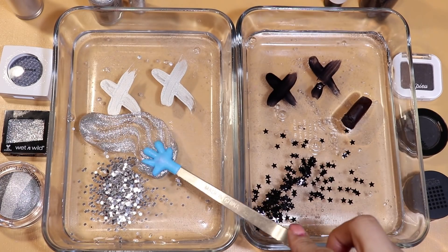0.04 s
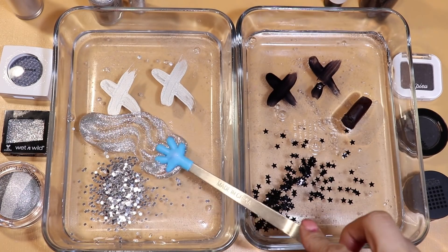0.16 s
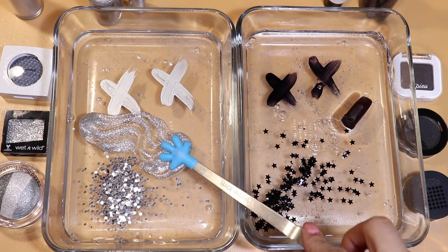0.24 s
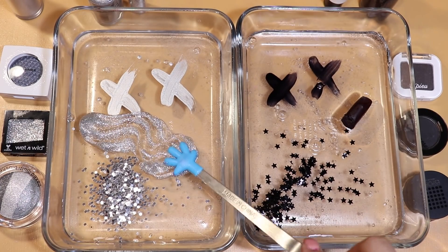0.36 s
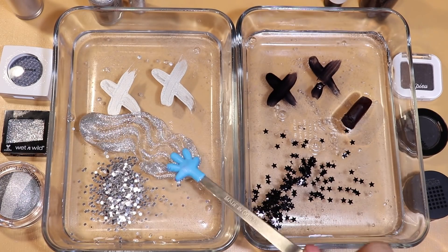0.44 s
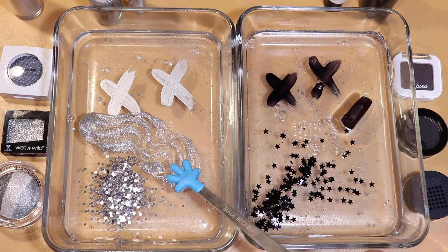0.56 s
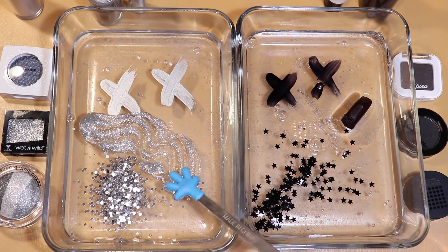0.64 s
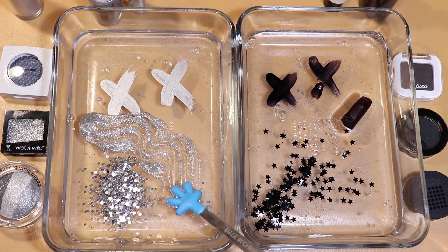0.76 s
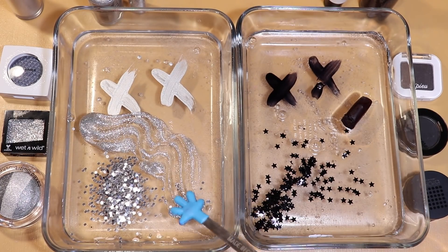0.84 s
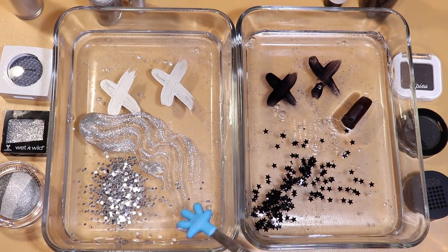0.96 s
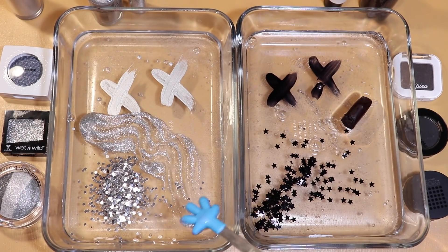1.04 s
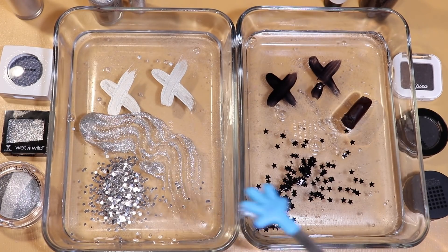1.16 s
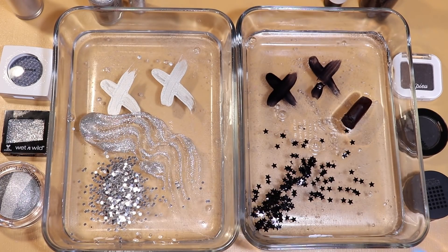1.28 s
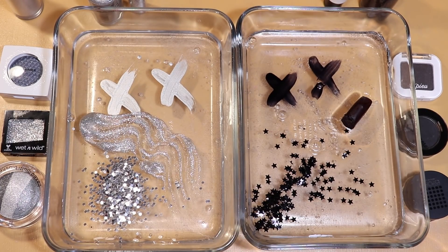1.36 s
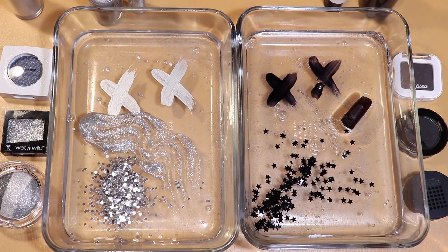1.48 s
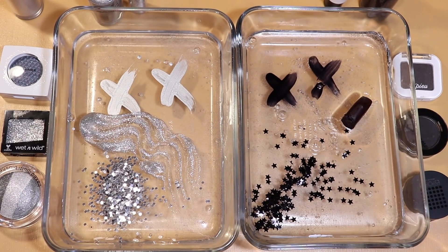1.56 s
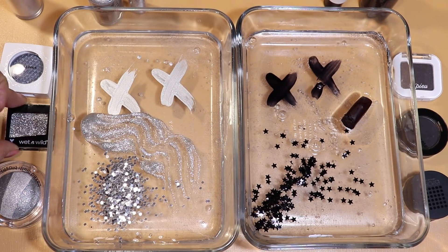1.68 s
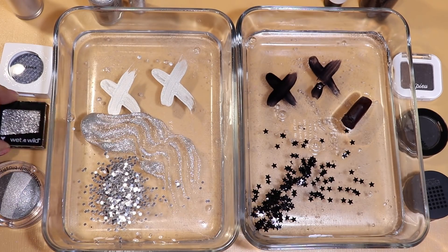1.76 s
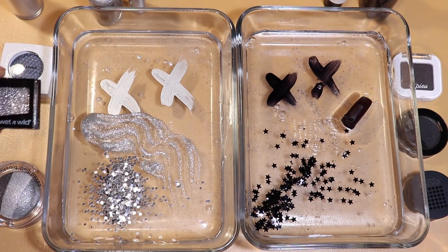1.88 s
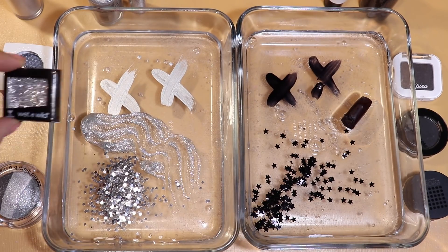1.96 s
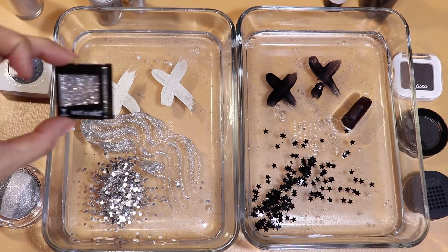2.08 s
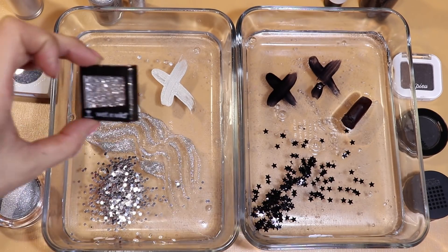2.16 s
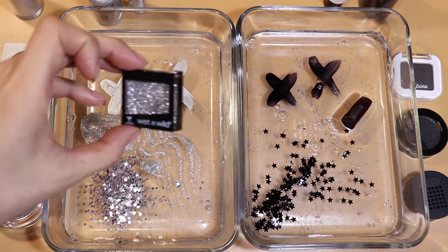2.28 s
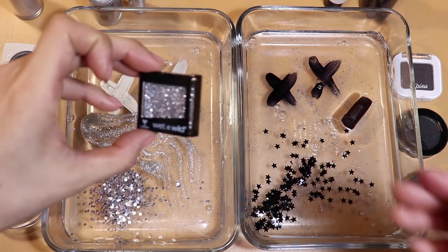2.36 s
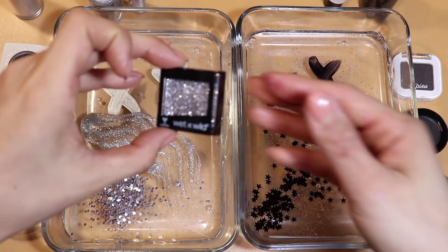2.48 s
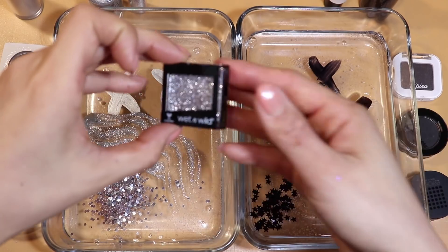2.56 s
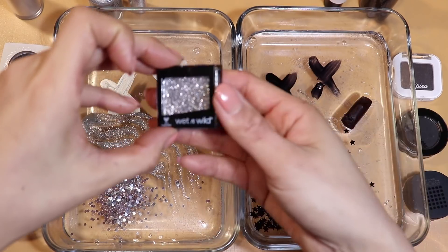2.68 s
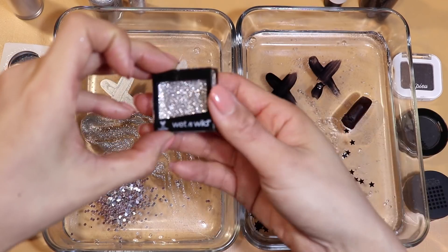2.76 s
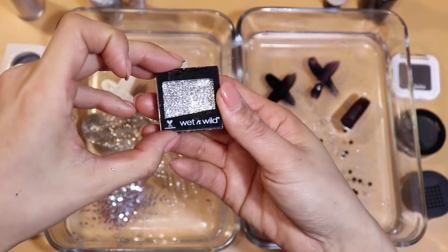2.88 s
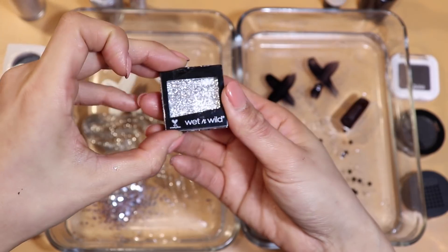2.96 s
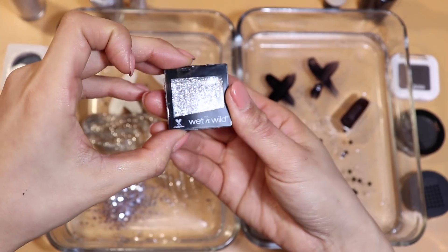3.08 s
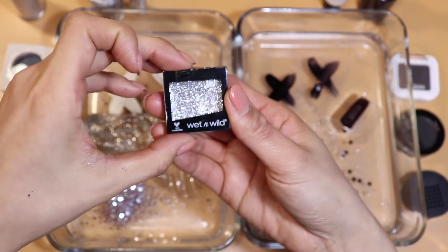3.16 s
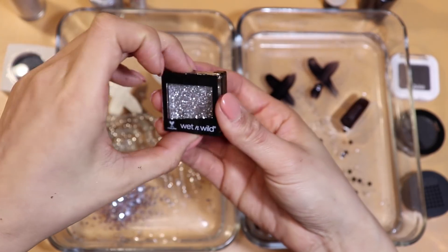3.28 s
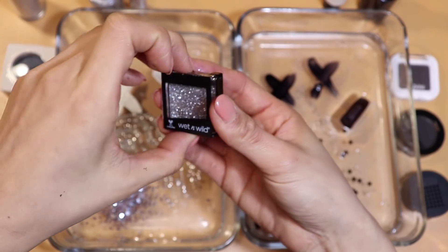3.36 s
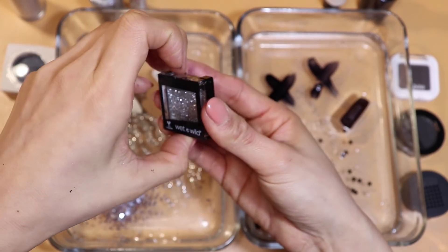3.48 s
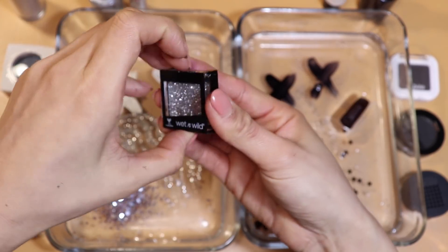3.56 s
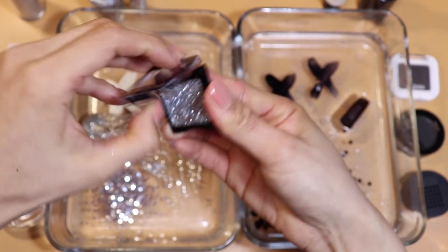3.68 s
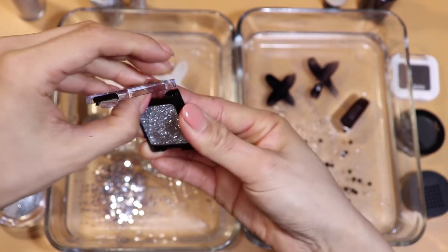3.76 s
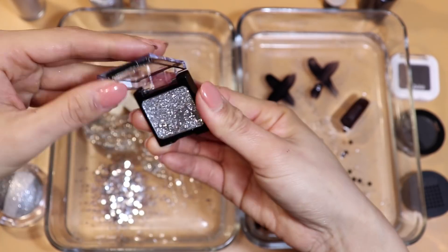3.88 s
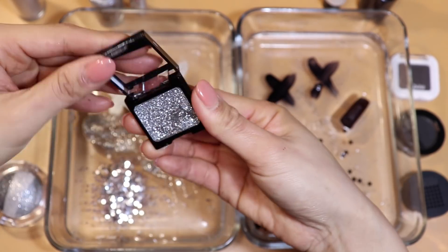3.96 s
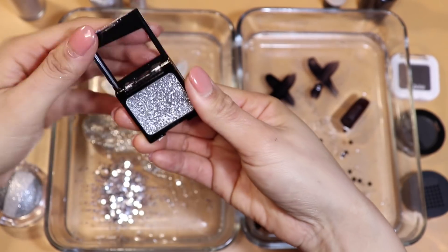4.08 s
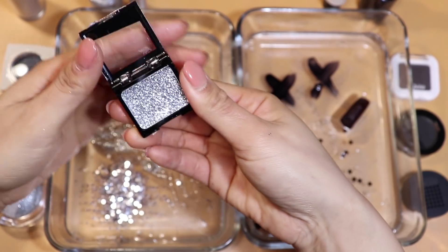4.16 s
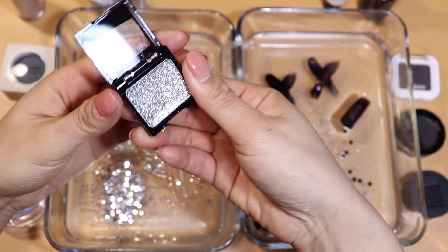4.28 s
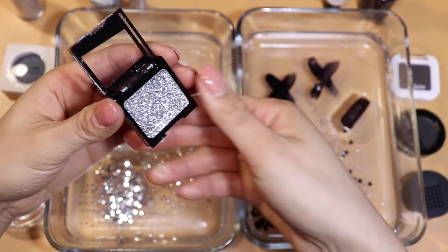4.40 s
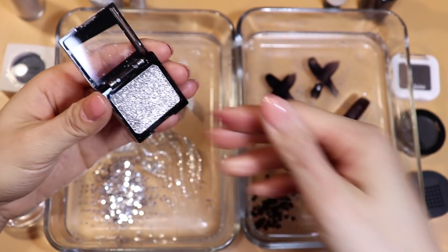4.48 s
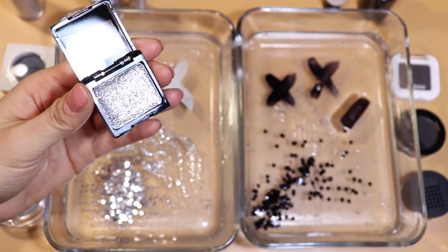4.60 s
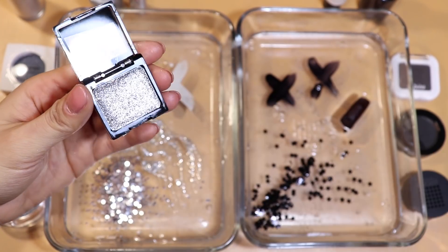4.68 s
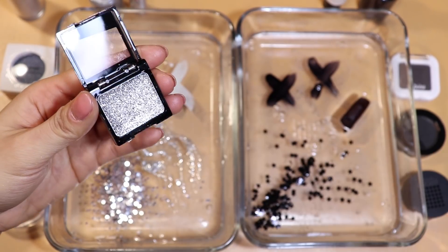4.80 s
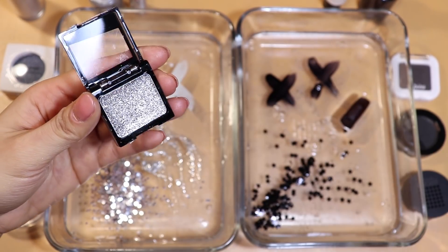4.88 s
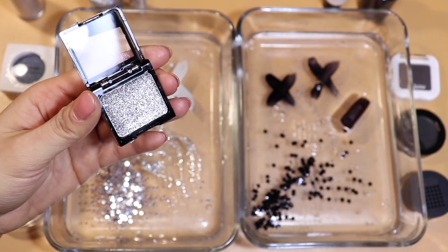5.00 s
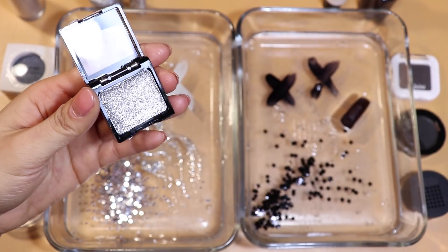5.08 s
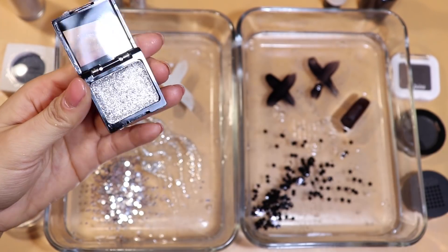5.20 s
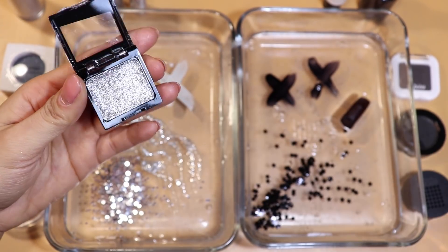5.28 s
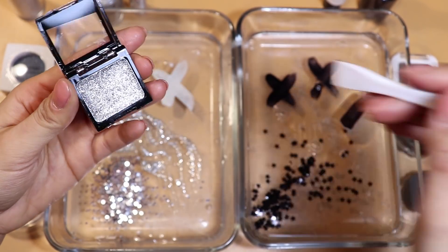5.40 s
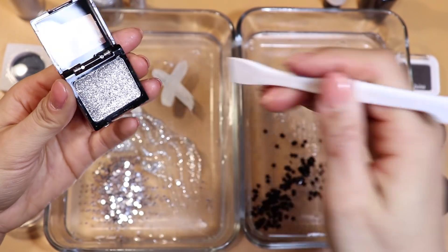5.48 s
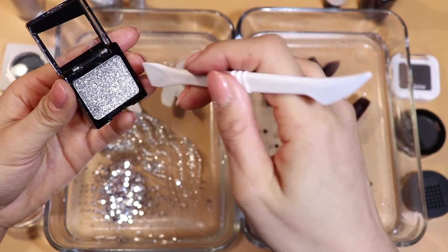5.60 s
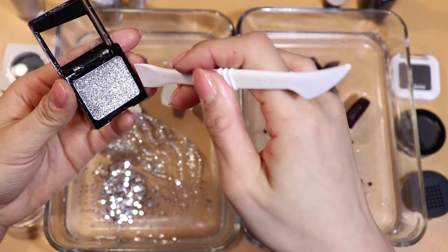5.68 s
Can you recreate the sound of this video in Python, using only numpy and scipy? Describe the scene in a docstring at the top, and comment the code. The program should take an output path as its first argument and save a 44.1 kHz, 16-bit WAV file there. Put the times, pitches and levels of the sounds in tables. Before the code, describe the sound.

In a small quiet room with faint ventilation hum and hiss, tongs give a light tick on a glass dish, then land on a table with a low, soft thud and a metal click. Fingers pat and slide on a plastic case, its catch clicks, and the lid snaps free very sharply. The hinge rubs faintly, then a plastic spatula clatters briefly. Close stereo microphones, short room echo.

```python
"""Small metal-handled tongs tick on a glass dish and are laid on a craft table, soft end first, with a thud;
fingers handle a plastic compact, its catch gives, the lid snaps free, the hinge rubs, and a plastic spatula
clatters softly as it is picked up. Two microphones stand close above the table in a small quiet room;
ventilation hums and the microphones hiss. Each touch is a click or a swell of tiny slips that rings resonances,
with a level and time offset between microphones, nearby reflections and echo. Hum and hiss are shaped noise."""
import sys
import numpy as np
from scipy import signal
from scipy.fft import rfft, irfft, next_fast_len
from scipy.io import wavfile

SR = 44100
rng = np.random.default_rng(int(sys.argv[2]) if len(sys.argv) > 2 else 0)


def to_wav(sig):
    """Store sig (one row per channel, or 1-D mono) as 16-bit WAV at the path in sys.argv[1].

    Samples outside -1..1 are clipped; the rate is SR.
    """
    pcm = np.clip(np.atleast_2d(sig), -1, 1) * 32767
    pcm = np.round(pcm).astype(np.int16)
    wavfile.write(sys.argv[1], SR, pcm.T)  # frames by channels


N = 252951  # length [samples]

# Air rumble and hiss, spectrum before overall scaling: (frequency [Hz], relative density [dB])
AIR_SPECTRUM = [(15, -59), (25, -8), (37, -28), (59, -4), (96, -5), (141, -5.5), (248, -4), (276, -9),
                (316, -7), (486, -8), (527, -10.5), (620, -10.5), (791, -12), (8730, -22.5), (15800, -33)]
# Stereo width of the air: (frequency [Hz], side minus mid [dB])
AIR_WIDTH = [(60, -6.5), (110, -1), (200, -1), (380, -1), (700, -0.5), (1290, 0), (2380, 0.5), (4400, 0.5),
             (8120, -0.5), (15000, 0.5)]
AIR_MID_RMS_DB = -58
# Ventilation hum: (frequency [Hz], width of each filter pass [Hz], rms before the slight left tilt [dB])
VENTILATION_HUM = [(72, 15, -76), (141.8, 2.65, -69.5), (281.3, 35, -69)]
# Room echo: (frequency [Hz], time to fall by 60 dB [s])
ROOM_T60 = [(150, 0.27), (1000, 0.32), (4000, 0.27), (8000, 0.29), (15000, 0.17)]

# Tongs tick on the dish: (time [s], level [dB], sliding time [s], hardness [Hz])
TONGS_TICKS = [(.3453, -9, 0.00069, 14000), (.3495, -10.5, 0.0018, 9000), (.377, -24, 0.0026, 4000)]
# Resonances of tongs and dish: (frequency [Hz], width of each filter pass [Hz], level [dB])
TONGS_MODES = [(1760, 170, -0.5), (2860, 400, -5), (3750, 290, -2), (4520, 640, -5), (5800, 1100, -10),
               (6940, 1150, -6), (11200, 7900, -14)]

# The tongs' soft end lands with a thud and rocks to rest, each bump weaker than the last
THUD_S, THUD_DB, THUD_SLIDING_S, THUD_HARDNESS_HZ = 1.0135, 2, 0.0016, 350
ROCK_GAP_S, ROCK_LOSS_DB = .019, 1.5
# Their metal handle clicks on the table: (time [s], level [dB], hardness [Hz]); then it drags a little
HANDLE_CLICKS = [(1.0205, -4, 3000), (1.0283, -3, 11000), (1.0308, -1, 3800)]
HANDLE_SLIDING_S = 0.002
DRAG_AFTER_S, DRAG_DB, DRAG_SLIDING_S, DRAG_HARDNESS_HZ = .022, -2.5, .02, 3200
# Resonances of the table under the tongs: (frequency [Hz], width [Hz], level [dB])
TABLE_MODES = [(135, 14, 4), (205, 25, 2), (233, 14, 7), (298, 45, 4), (750, 300, -13), (1400, 900, -15),
               (3700, 3000, -14), (9000, 5000, -19)]

# Fingers slide on the case, and last on the spatula: (time [s], level [dB], hardness [Hz])
FINGER_SLIDES = [(2.386, -16.5, 2500), (3.232, -23, 4000), (3.992, -17, 1800), (4.535, -19.5, 16000),
                 (5.118, -14, 4000)]
SLIDE_S = .009
# Fingertips pat the case: (time [s], level [dB])
FINGER_PATS = [(2.864, -5), (3.034, -8)]
PAT_SLIDING_S, PAT_HARDNESS_HZ = 0.0023, 500
# Resonances of hand-held plastic: (frequency [Hz], width of each filter pass [Hz], level [dB])
HELD_PLASTIC_MODES = [(1540, 700, -4), (2350, 600, -7), (3140, 450, -1), (3640, 500, -1.5), (4550, 690, -4),
                      (9000, 7000, -22)]
# The shut lid ticks in its play: (time [s], level [dB])
LID_PLAY = [(2.7955, -15), (2.895, -19), (2.965, -20)]
PLAY_SLIDING_S, PLAY_HARDNESS_HZ = .0003, 8000
# Resonances of the shut lid: (frequency [Hz], width of each filter pass [Hz], level [dB])
SHUT_LID_MODES = [(1900, 900, -15), (2980, 450, 3.5), (4860, 1900, -12)]

# The catch slips, gives and clicks back: (time [s], level [dB], hardness [Hz])
CATCH_SLIPS = [(3.7284, -4.5, 4500), (3.7396, 6.5, 2000), (3.7413, 11.5, 8500), (3.7492, -1.5, 20000)]
CATCH_SLIDING_S = 0.00016
# Resonances of the catch: (frequency [Hz], width of each filter pass [Hz], level [dB])
CATCH_MODES = [(420, 840, -22.5), (1870, 460, -5.5), (2630, 560, -9.5), (3190, 420, 2), (4230, 390, -2.5),
               (5100, 600, -5.5), (6300, 430, -10), (7550, 1000, -12), (8700, 1600, -20),
               (13000, 5900, -20.5)]

# The catch scrapes over the lip of the base: the grip builds to a peak, then eases until the lid is free
LIP_S, LIP_LENGTH_S, LIP_RISE_S = 3.7886, .014, 0.0026
LIP_DB, LIP_RISE_DB, LIP_EASE_DB_PER_S = 14.5, 6.5, 1100
LIP_SLIDING_S, LIP_HARDNESS_HZ = 0.0014, 7000
# Resonances of the base with its lip: (frequency [Hz], width [Hz], level [dB])
LIP_MODES = [(745, 510, -26), (1970, 370, -17), (3020, 400, -15), (3720, 530, -8), (5360, 370, 0.5),
             (6100, 650, -13), (6800, 700, -4), (7800, 830, -2.5), (9900, 720, -3), (10700, 1200, -7),
             (12000, 1100, -5), (13700, 1000, -6), (15000, 670, 2), (15200, 600, -10)]
# The freed lid cracks back and rebounds once
CRACK_S, CRACK_DB, CRACK_SLIDING_S, CRACK_HARDNESS_HZ = 3.803, 12.5, .00025, 12000
REBOUND_GAP_S, REBOUND_LOSS_DB = .0044, 8
# Resonances of the freed lid: (frequency [Hz], width of each filter pass [Hz], level [dB])
LID_MODES = [(720, 810, -26), (2500, 950, -15), (3270, 300, -5), (5340, 1100, -6), (6300, 1600, -6),
             (7640, 1300, -11), (9500, 940, 0), (10720, 1040, 4), (12040, 1100, -9.5), (13800, 1600, -2),
             (15300, 990, -2)]

# The hinge rubs: (time [s], level [dB], sliding time [s], hardness [Hz])
HINGE_RUBS = [(3.935, -13.5, 0.0094, 16100), (4.205, -10.5, .012, 3000), (4.228, -19.5, 0.037, 6950),
              (4.425, -27, 0.0058, 18000)]
# Resonances of the hinge: (frequency [Hz], width of each filter pass [Hz], level [dB])
HINGE_MODES = [(1500, 660, -12.5), (2380, 420, -4.5), (5060, 1200, -3.5), (7900, 1500, -15),
               (9760, 830, 2.5), (15000, 1200, -1)]

# The spatula brushes the table around its clatter: (time [s], level [dB], hardness [Hz])
SPATULA_BRUSHES = [(4.9275, -1, 1500), (5.045, -15.5, 6000), (5.114, -9.5, 5000), (5.254, -21, 16000)]
BRUSH_SLIDING_S = 0.0063
# The spatula knocks on the table: (time [s], level [dB], hardness [Hz])
SPATULA_KNOCKS = [(4.933, 1.5, 12000), (4.964, -2.5, 4500), (4.978, -4, 9000)]
KNOCK_SLIDING_S = .0004
# After the first knock it chatters along the table, ever softer in tone, and fades as it lifts
CHATTER_S, CHATTER_LENGTH_S, CHATTER_HOLD_S = 4.9365, .078, .052
CHATTER_DB, CHATTER_SPREAD_DB, LIFT_DB_PER_S = -6.5, 3, 400
CHATTER_SLIDING_S, CHATTER_HARDNESS_HZ, CHATTER_DULLING_S = .0015, 8000, 0.066
# Resonances of the spatula: (frequency [Hz], width of each filter pass [Hz], level [dB])
SPATULA_MODES = [(109, 140, -7.5), (292, 58, -1), (427, 150, -8), (613, 270, -4.5), (1110, 340, -7.5),
                 (1486, 270, -3.5), (1880, 450, -10), (2630, 810, -12), (3680, 720, -7),
                 (4260, 1100, -11.5), (5630, 1700, -12.5), (6500, 1000, -6), (9100, 2600, -18),
                 (11550, 1300, -11), (14500, 2200, -25)]

CUTOFF_HZ = 15850


def from_db(db):
    """Decibels to gain."""
    return 10 ** (np.asarray(db) / 20)


def unit_energy(x):
    """Scale so that the squares of each channel sum to one."""
    return x / np.sqrt(np.sum(x ** 2, axis=-1, keepdims=True) + 1e-20)


def at_hz(points, hz):
    """Read a table along a log-frequency axis."""
    known_hz, values = np.transpose(points)
    return np.interp(np.log(np.maximum(hz, 1)), np.log(known_hz), values)


def colourless(noise):
    """Keep the irregular timing of a burst but spread its energy evenly over all pitches."""
    spectrum = rfft(noise)
    return irfft(spectrum / (np.abs(spectrum) + 1e-12), noise.shape[-1])


def resonate(x, hz, width):
    """One resonance with a gain of about one at its top."""
    r = np.exp(-np.pi * width / SR)
    feed = np.array([1, 0, -1]) * (1 - r * r) / 2
    feedback = [1, -2 * r * np.cos(2 * np.pi * hz / SR), r * r]
    return signal.lfilter(feed, feedback, x + 1e-18)


def contact_force(contacts, size=8192):
    """Brief contacts are mostly one click; longer ones break up into a swell of tiny slips."""
    force, t = np.zeros(N + size), np.arange(size) / SR
    for s, level_db, sliding, hardness_hz in contacts:
        swell = np.sqrt(t / sliding) * np.exp(-t / sliding)
        uneven = from_db(rng.normal(0, 9.4, size))
        grit = swell * rng.standard_normal(size) * uneven
        slips = unit_energy(colourless(grit) * np.exp(-t / (10 * sliding)))
        clean = np.exp(-sliding / 0.0025)  # share of the energy in the first click
        push = np.sqrt(1 - clean) * slips + np.sqrt(clean) * (t == 0)
        soft = np.exp(-2 * np.pi * hardness_hz / SR)  # a soft touch loses its treble
        touch = signal.lfilter([1 - soft], [1, -soft], push)
        start = int(s * SR)
        force[start:start + size] += from_db(level_db) * touch
    return force[:N]


def struck(contacts, modes, order=1):
    """An object rings in all its modes; at order two each swells briefly and the valleys between are deeper."""
    force, out = contact_force(contacts), 0
    for k, (hz, width, db) in enumerate(modes):
        mode = force
        for _ in range(order):
            mode = resonate(mode, hz, width)
        out = out + (-1) ** k * from_db(db) * mode  # neighbours alternate in sign
    return out


def touches(rows, sliding, *hardness_hz):
    """Contacts (time, level, sliding time, hardness) of one kind; the hardness is shared or ends each row."""
    return [(s, db, sliding, *own, *hardness_hz) for s, db, *own in rows]


def bounces(s, db, gap, loss_db, count):
    """Rows (time [s], level [dB]) of a blow and its evenly weakening repeats."""
    return [(s + k * gap, db - k * loss_db) for k in range(count)]


def uneven_run(length, count):
    """Moments of stick and slip: the first at zero, the rest jittered about an even pace."""
    steps = np.arange(count)
    jitter = rng.uniform(-1, 1, count) / 3 * (steps > 0)
    return (steps + jitter) * length / count


def nearby_scatter(size=512):
    """Hands, dishes and table top throw back a few milliseconds of reflections, unlike at each microphone."""
    t = np.arange(size) / SR
    burst = rng.standard_normal((2, size)) * t * np.exp(-t / 0.00039)
    return unit_energy(colourless(burst) * np.exp(-t / 0.0015))


def room_response(size=22050):
    """Diffuse reflections build up within milliseconds and die away band by band."""
    t, hz = np.arange(size) / SR, np.arange(size // 2 + 1) * SR / size
    white = rfft(rng.standard_normal((2, size)))
    centres = [centre for centre, _ in ROOM_T60]
    tail = 0
    for (_, t60), shares in zip(ROOM_T60, np.eye(len(ROOM_T60))):
        band = at_hz(list(zip(centres, shares)), hz)  # overlapping bands, each full at its own centre
        tail = tail + irfft(white * band, size) * from_db(-60 * t / t60)
    walls = signal.butter(1, 12000, fs=SR, output="sos")
    build_up = 1 - np.exp(-(t / 0.0016) ** 2)
    return unit_energy(signal.sosfilt(walls, tail) * build_up)


def place(sound, pan_db, lag_ms, wet_db):
    """Offset the microphones by pan (left minus right) and lag (left leads); add near reflections and echo."""
    size = next_fast_len(N)
    hz = np.arange(size // 2 + 1) * SR / size
    delay = np.exp(-2j * np.pi * hz * lag_ms / 1000)
    direct = np.array([sound, irfft(rfft(sound, size) * delay, size)[:N]])
    near = from_db(-5) * signal.fftconvolve(sound[None], nearby_scatter(), axes=1)[:, :N]
    echo = signal.fftconvolve(sound[None], room_response(), axes=1)[:, :N]
    pan = from_db([[pan_db / 2], [-pan_db / 2]])
    return (direct + near) * pan + from_db(wet_db) * echo


def room_tone():
    """Steady air rumble and microphone hiss, partly shared by both sides, with a wavering fan hum."""
    size = next_fast_len(N)
    hz = np.arange(size // 2 + 1) * SR / size
    mid, side = rfft(rng.standard_normal((2, size))) * from_db(at_hz(AIR_SPECTRUM, hz))
    mid = irfft(mid, size)[:N]
    side = irfft(side * from_db(at_hz(AIR_WIDTH, hz)), size)[:N]
    air = from_db(AIR_MID_RMS_DB) * np.array([mid + side, mid - side]) / np.std(mid)
    for hum_hz, width, db in VENTILATION_HUM:
        line = resonate(resonate(rng.standard_normal(N), hum_hz, width), hum_hz, width)
        air = air + from_db(db) * line / np.std(line)
    return air * from_db([[.2], [-.2]])


def tongs_ticks():
    """Light touches of the tongs on the dish ring both."""
    return struck(TONGS_TICKS, TONGS_MODES, order=2)


def tongs_laid():
    """The soft end thuds and rocks, the metal handle clicks down and drags, and the table rings."""
    rocking = bounces(THUD_S, THUD_DB, ROCK_GAP_S, ROCK_LOSS_DB, count=5)
    contacts = touches(rocking, THUD_SLIDING_S, THUD_HARDNESS_HZ)
    contacts += touches(HANDLE_CLICKS, HANDLE_SLIDING_S)
    contacts += [(THUD_S + DRAG_AFTER_S, DRAG_DB, DRAG_SLIDING_S, DRAG_HARDNESS_HZ)]
    return struck(contacts, TABLE_MODES)


def finger_touches():
    """Short dull pats and longer, brighter slides on held plastic: the case, and last the spatula."""
    pats = touches(FINGER_PATS, PAT_SLIDING_S, PAT_HARDNESS_HZ)
    slides = touches(FINGER_SLIDES, SLIDE_S)
    return struck(pats + slides, HELD_PLASTIC_MODES, order=2)


def lid_play():
    """The shut lid ticks as it shifts in its play."""
    return struck(touches(LID_PLAY, PLAY_SLIDING_S, PLAY_HARDNESS_HZ), SHUT_LID_MODES, order=2)


def catch_gives():
    """Very brief slips ring the catch."""
    return struck(touches(CATCH_SLIPS, CATCH_SLIDING_S), CATCH_MODES, order=2)


def lip_scrape():
    """A quick run of slips climbs the lip and eases off behind it, ringing the base."""
    t = uneven_run(LIP_LENGTH_S, count=7)
    below_peak_db = LIP_RISE_DB * np.maximum(1 - t / LIP_RISE_S, 0)
    eased_db = LIP_EASE_DB_PER_S * np.maximum(t - LIP_RISE_S, 0)
    slips = zip(LIP_S + t, LIP_DB - below_peak_db - eased_db)
    return struck(touches(slips, LIP_SLIDING_S, LIP_HARDNESS_HZ), LIP_MODES)


def lid_crack():
    """One hard blow and its rebound ring the freed lid."""
    blows = bounces(CRACK_S, CRACK_DB, REBOUND_GAP_S, REBOUND_LOSS_DB, count=2)
    return struck(touches(blows, CRACK_SLIDING_S, CRACK_HARDNESS_HZ), LID_MODES, order=2)


def hinge_rubs():
    """Rubbing contacts ring the hinge."""
    return struck(HINGE_RUBS, HINGE_MODES, order=2)


def spatula_pickup():
    """A few clear knocks in a dense chatter, with light brushes around them, ring the spatula."""
    t = uneven_run(CHATTER_LENGTH_S, count=18)
    lift_db = LIFT_DB_PER_S * np.maximum(t - CHATTER_HOLD_S, 0)
    db = CHATTER_DB - lift_db + CHATTER_SPREAD_DB * rng.standard_normal(len(t))
    hardness_hz = CHATTER_HARDNESS_HZ * np.exp(-t / CHATTER_DULLING_S)
    contacts = touches(SPATULA_KNOCKS, KNOCK_SLIDING_S)
    contacts += touches(zip(CHATTER_S + t, db, hardness_hz), CHATTER_SLIDING_S)
    contacts += touches(SPATULA_BRUSHES, BRUSH_SLIDING_S)
    return struck(contacts, SPATULA_MODES, order=2)


def scene():
    """Tongs, compact and spatula on the table of one room."""
    tongs = place(tongs_ticks(), pan_db=1.0, lag_ms=0.048, wet_db=-4.5)
    table = place(tongs_laid(), pan_db=-0.5, lag_ms=0.0095, wet_db=-15)
    fingers = place(finger_touches() + lid_play(), pan_db=-2, lag_ms=0.017, wet_db=-4)
    catch = place(catch_gives(), pan_db=0.0, lag_ms=0.037, wet_db=-9)
    snap = place(lip_scrape() + lid_crack(), pan_db=1.2, lag_ms=.034, wet_db=-6.0)
    hinge = place(hinge_rubs(), pan_db=3.5, lag_ms=0.035, wet_db=1.0)
    spatula = place(spatula_pickup(), pan_db=-2.0, lag_ms=-0.06, wet_db=-4)
    return room_tone() + tongs + table + fingers + catch + snap + hinge + spatula


def record(dry):
    """A steep low-pass cuts the top of the treble."""
    low_pass = signal.ellip(12, .1, 70, CUTOFF_HZ, fs=SR, output="sos")  # ripple .1 dB, stop band -70 dB
    return signal.sosfilt(low_pass, dry)


dry = scene()
out = record(dry)
to_wav(out)
```